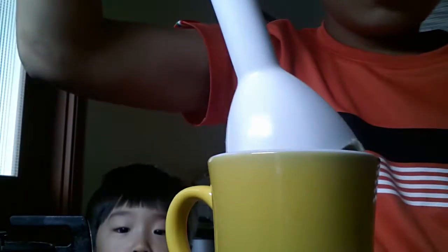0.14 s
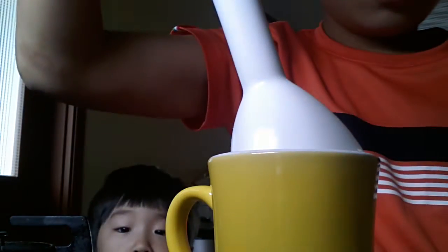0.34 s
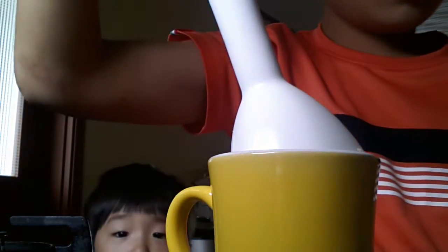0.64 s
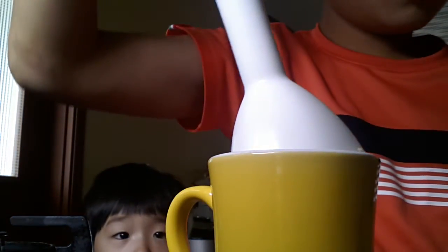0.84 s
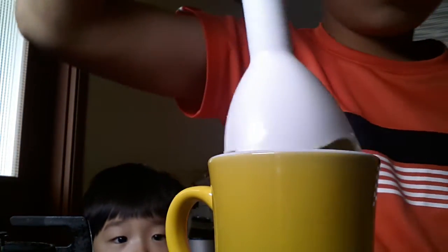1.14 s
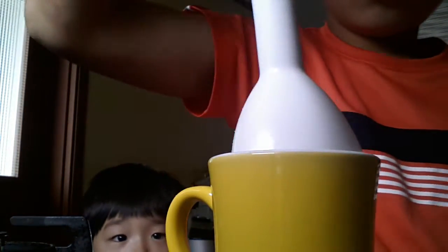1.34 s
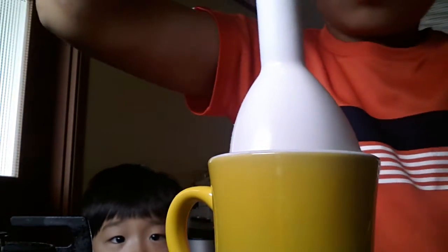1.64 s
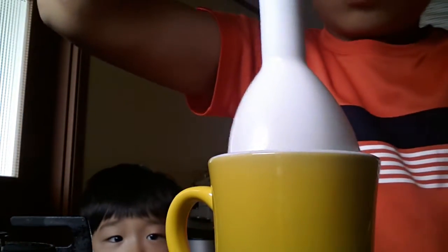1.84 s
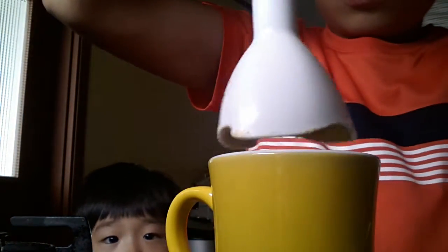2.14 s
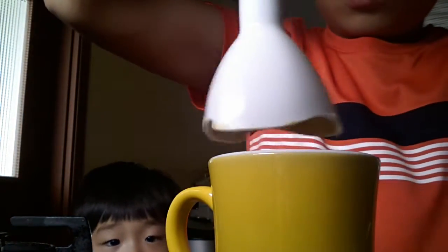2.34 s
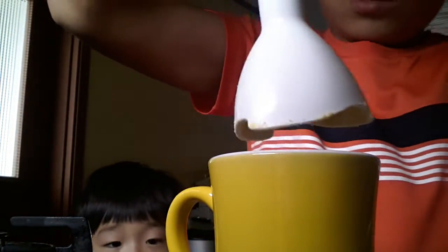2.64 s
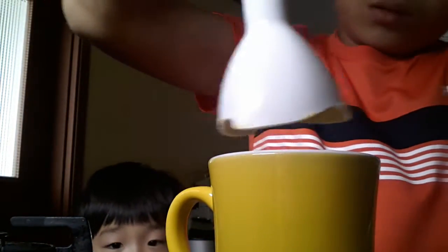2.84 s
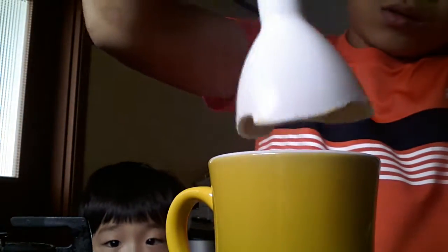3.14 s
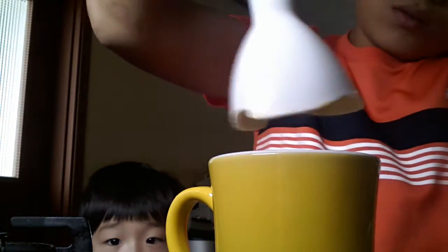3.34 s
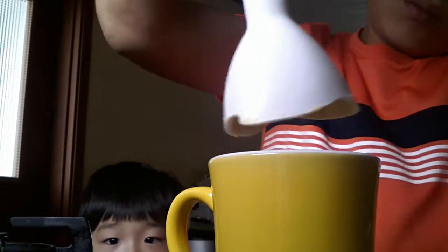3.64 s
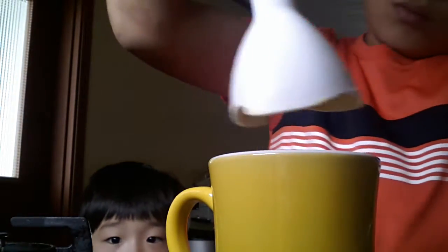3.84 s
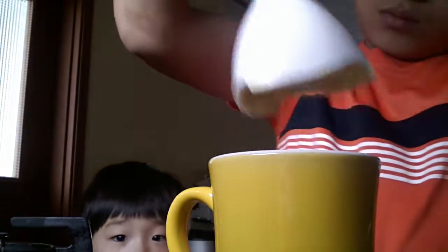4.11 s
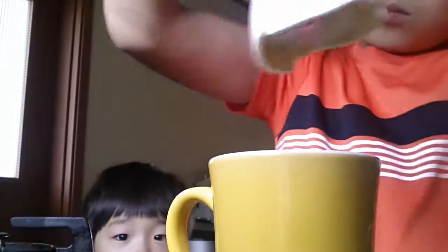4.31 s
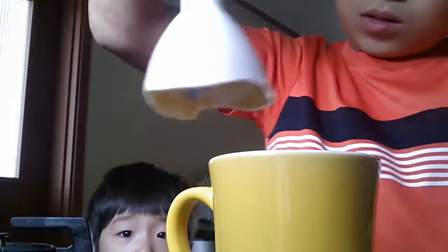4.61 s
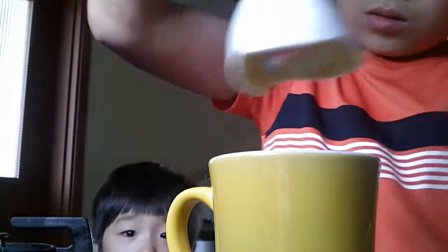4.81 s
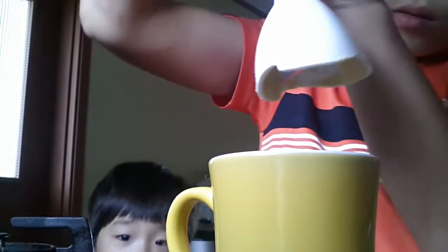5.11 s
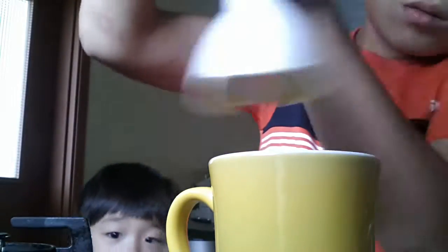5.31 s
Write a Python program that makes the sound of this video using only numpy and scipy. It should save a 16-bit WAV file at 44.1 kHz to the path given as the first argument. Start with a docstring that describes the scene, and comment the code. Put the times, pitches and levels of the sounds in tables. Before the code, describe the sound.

Close stereo pickup in a small, quiet kitchen. A fading knock and faint ceramic ping open, then dull bumps and dry snaps as a blender guard presses snacks in a mug. Ceramic clinks bounce side to side, a button clicks, and the motor whines and rattles in one half-second run and three short bursts. It coasts down with a thin whistle; soft bump, light plastic clicks and grip rubbing follow.

```python
"""A knock is fading as a stick blender goes down onto dry snacks in a ceramic mug: dull bumps and snapping pieces.
Then it clinks against the mug wall, each hit bouncing to the other side. Lifted clear, its motor runs in one long
and three short bursts: shaft tones whine, the loose shaft rattles, and brushes whistle as it coasts to a stop.
A soft bump and a few plastic clicks follow. The hand rubs the grip in the still air of a small kitchen.
Knocks and pings are fading sines; snaps, clinks, clicks, rattle, rubbing and air are shaped noise."""
import sys
import numpy as np
from scipy import signal
from scipy.fft import rfft, irfft
from scipy.io import wavfile
from scipy.ndimage import uniform_filter1d

SR = 44100
rng = np.random.default_rng(int(sys.argv[2]) if len(sys.argv) > 2 else 0)


def wrap_up_sound(samples):
    """Save the sound to the file named by the first command line argument, as 16-bit audio."""
    columns = np.atleast_2d(samples).T
    # keep every value between -1 and 1, then stretch to whole-number steps
    tamed = np.clip(columns, -1, 1)
    steps = np.round(tamed * 32767).astype(np.int16)
    wavfile.write(sys.argv[1], SR, steps)


N = 240820
TIME = np.arange(N) / SR
SIZE = 2 ** 19  # FFT length, samples
HZ = np.maximum(np.arange(SIZE // 2 + 1) * SR / SIZE, 1)


def from_db(db):
    """Turn decibels into a gain."""
    return 10 ** (np.asarray(db) / 20)


def rms_of(x):
    """Root mean square, the usual measure of strength."""
    return np.sqrt(np.mean(np.abs(x) ** 2))


def rms_one(x):
    """Scale to unit power."""
    return x / (rms_of(x) + 1e-20)


def at_hz(points, hz):
    """Read levels between the listed frequencies, on a log-frequency axis."""
    points = np.array(points)
    return np.interp(np.log(hz), np.log(points[:, 0]), points[:, 1])


def pan(balance_db):
    """Left and right gains of constant power, from left minus right in dB."""
    gains = from_db(np.array([[.5], [-.5]]) * balance_db)
    return gains / np.sqrt(np.mean(gains ** 2, axis=0))


def drift(rate):
    """Random wandering: straight lines between random values of spread 1, `rate` values per second."""
    knots = rng.standard_normal(N // 20)
    return np.interp(TIME * rate, np.arange(len(knots)), knots)


def body(x, spectrum, peaks=()):
    """Causal filter of unit power: a broad colour with ringing resonances on top."""
    # folding the cepstrum gives a filter that never sounds before its input
    cepstrum = irfft(np.log(from_db(at_hz(spectrum, HZ))))
    response = np.exp(rfft(2 * cepstrum[:SIZE // 2], SIZE))
    resonances = sum((from_db(db) - 1) / (1 + 2j * (HZ - hz) / width) for hz, width, db in peaks)
    response = response * (1 + resonances)
    return irfft(rfft(x, SIZE) * response / rms_of(response))[..., :N]


def burst(s, level_db, decay, grit_db=-1.5):
    """A contact: a quickly dying shower of uneven tiny impacts, its level taken over 25 ms."""
    age = TIME[:SR // 5]
    # the strength changes every 20 samples
    grit = np.repeat(rng.standard_normal(len(age)), 20)[:len(age)]
    impacts = rng.standard_normal(len(age)) * from_db(grit_db * grit)
    shower = impacts * np.exp(-age / decay) * (1 - np.exp(-age / 0.0019))
    out = np.zeros(N + SR)
    start = max(int(s * SR), 0)
    out[start:start + len(age)] = from_db(level_db) * rms_one(shower) * np.sqrt(.025 * SR / len(age))
    return out[:N]


def contacts(table, colour, peaks=()):
    """Hard contacts sounding through one body."""
    hits = sum(pan(balance) * burst(s, db, decay) for s, db, decay, balance in table)
    return body(hits, colour, peaks)


KITCHEN_T60_S, NEAR_T60_S, LEFT_LAG_S = 0.24, 0.079, .00048


def kitchen(x, near_db, far_db, wall_hz=9000):
    """Direct sound, later on the left, plus table reflections and a duller room tail unlike in each ear."""
    age = TIME[:SR // 2]

    def tail(t60):
        noise = rng.standard_normal((2, len(age)))
        return rms_one(noise * from_db(-60 * age / t60) * (age > .002))

    near = tail(NEAR_T60_S)
    far = signal.lfilter(*signal.butter(1, wall_hz, fs=SR), tail(KITCHEN_T60_S))
    echoes = (from_db(near_db) * near + from_db(far_db) * far) / np.sqrt(len(age))
    # the direct sound
    echoes[0, int(LEFT_LAG_S * SR)] += 1
    echoes[1, 0] += 1
    echoes /= np.sqrt(np.sum(echoes ** 2) / 2)
    return signal.fftconvolve(x * np.ones((2, 1)), echoes, axes=1)[:, :N]


# button held: (start time [s], end time [s], extra rattle at full speed [dB])
PRESSES = [(2.275, 2.853, 0), (3.053, 3.17, 1), (3.3502, 3.4713, 5.3), (3.6483, 3.7377, 4)]
# shaft: top speed and first kick (turns per s), spin-up time, air drag time
FULL_HZ, KICK_HZ, SPIN_UP_S, DRAG_S = 226.14, 67, .0571, .932
FRICTION_HZ_PER_S = 199.3  # bearing friction: turns per s lost each s


def shaft_speed():
    """Turns per second: a press pulls the shaft towards top speed, then drag and friction slow it."""
    speed = np.zeros(N)
    brake = FRICTION_HZ_PER_S * DRAG_S
    for on, off, _ in PRESSES:
        gap = FULL_HZ - max(np.interp(on, TIME, speed), KICK_HZ)
        spinning_up = FULL_HZ - gap * np.exp(-np.abs(TIME - on) / SPIN_UP_S)
        speed = np.where(TIME > on, spinning_up, speed)
        coasting = (np.interp(off, TIME, speed) + brake) * np.exp(-np.abs(TIME - off) / DRAG_S) - brake
        speed = np.where(TIME > off, coasting, speed)
    return np.maximum(speed, 1e-3)


# rattle: level at full speed, loss per turn per s below it; the shaft whips above WHIP_HZ, settles below SETTLE_HZ
SHAKE_DB, SHAKE_DB_PER_HZ, WHIP_HZ, SETTLE_HZ = -29, 0.0969, 154, 43.5
JOLT_DB, JOLT_S = 14, 0.017  # the jolt of starting from rest


def shaking(speed):
    """Rattle in dB: it grows with speed, more in some presses once the shaft whips, and jumps at the start."""
    extra_db = np.zeros(N)
    for on, _, db in PRESSES:
        extra_db[TIME > on] = db
    whipping = np.clip((speed - WHIP_HZ) / (FULL_HZ - WHIP_HZ), 0, 1) ** 0.63
    jolt_db = JOLT_DB * np.exp(-np.abs(TIME - PRESSES[0][0]) / JOLT_S)
    return SHAKE_DB - SHAKE_DB_PER_HZ * (FULL_HZ - speed) + extra_db * whipping + jolt_db


# shaft tones at full speed: (multiple of shaft rate, level [dB])
SHAFT_TONES = [(1, -32), (2, -41.5), (3, -44.5), (4, -41), (5, -43), (6, -48.5), (7, -47), (8, -49.5),
               (9, -52.5), (10, -57.5)]
# how the housing radiates shaft tones: (frequency [Hz], level [dB])
HOUSING = [(80, -9.5), (150, -2.5), (225, -4), (300, -10), (390, -3), (450, 2), (570, 5), (680, 2),
           (820, 3), (905, 4), (1130, 3), (2300, 4)]
# side on which motor sound is stronger: (frequency [Hz], left minus right [dB])
MOTOR_BALANCE = [(200, 5), (420, 12.5), (1000, 10.5), (2500, 8.5), (3900, 10), (5000, 10), (6000, -0.5),
                 (8000, 3), (12000, 6)]


def shaft_tones(speed, pace, angle, torque, shaking_db, usual_db=-31, flutter_db=1.0):
    """Imbalance hums at the shaft rate; the overtones flutter and grow with the rattle."""
    tones = 0
    for k, db in SHAFT_TONES:
        if k == 1:
            force = pace ** 2.5
        else:
            swell_db = 0.71 * (shaking_db - usual_db) + flutter_db * drift(70)
            force = np.sqrt(pace) * torque * from_db(swell_db)
        radiated = from_db(db + at_hz(HOUSING, k * speed))
        wave = np.sin(k * angle + rng.uniform(0, 2 * np.pi))
        tones = tones + force * radiated * wave * pan(at_hz(MOTOR_BALANCE, k * speed))
    return tones


# brush whistle while coasting: (multiple of shaft rate, level [dB])
BRUSH_TONES = [(24, -43), (48, -36.5)]


def brush_whistle(speed, angle, powered):
    """The brushes sing on the commutator as it slows through a narrow range of speed."""
    near_singing_speed = np.exp(-((speed - 153) / 19) ** 2)  # turns per s
    singing = (1 - powered) * near_singing_speed * from_db(3 * drift(60))
    return singing * pan(15.0) * sum(from_db(db) * np.sin(k * angle) for k, db in BRUSH_TONES)


# colour of the low buzz: (frequency [Hz], level [dB per Hz])
BUZZ = [(40, -35.5), (150, -2), (330, -10), (520, 1.5), (800, 0), (1200, -7), (1550, -4), (2000, -2.5),
        (2800, -14), (4500, -34.5)]
# colour of the bright rattle: (frequency [Hz], level [dB per Hz])
RATTLE = [(1500, -36), (3050, -15), (3800, -12), (4800, -1.5), (5800, -5.5), (6600, -2.5), (7600, -6),
          (9000, -4.5), (11000, -13), (12500, -13.5), (14500, -33.5)]
# shaft and guard resonances: (frequency [Hz], width [Hz], level [dB])
GUARD = [(1520, 280, 11), (3800, 440, 12), (4280, 50, 4.5), (4974, 540, 6), (6520, 290, 9.5),
         (7280, 620, 9.5)]


def shaft_rattle(pace, angle, torque, strength, beat=0.3, whirl=0.056, grain_db=2.5, buzz_db=-5.0, rattle_db=2):
    """The loose shaft strikes its bearing unevenly on every turn and whirls round once in three."""
    strikes = np.exp(beat * np.cos(angle) + whirl * np.cos(angle / 3))
    blows = strength * rms_one(torque * strikes * from_db(grain_db * drift(500)))
    buzz = from_db(buzz_db) * body(blows * pace ** 0.1 * rng.standard_normal(N), BUZZ, GUARD)
    rattle = from_db(rattle_db) * body(blows * rng.standard_normal(N), RATTLE, GUARD)
    return irfft(rfft(buzz + rattle, SIZE) * pan(at_hz(MOTOR_BALANCE, HZ)))[:, :N]


MAINS_HZ = 60


def motor(ripple=0.78, wobble=0.0014):
    """Shaft tones, brush whistle and a rattle that beats with each turn and with the mains."""
    speed = shaft_speed()
    shaking_db = shaking(speed)
    turning = 1 - np.exp(-(speed / SETTLE_HZ) ** 3)
    pace = turning * speed / speed.max()
    held = sum(1. * ((TIME > on) & (TIME < off)) for on, off, _ in PRESSES)
    powered = uniform_filter1d(held, size=900)
    angle = 2 * np.pi * np.cumsum(speed * (1 + wobble * drift(200))) / SR
    # torque comes in mains pulses while the button is held, strongest while the shaft gathers speed
    effort = powered * np.clip(1 - speed / FULL_HZ, 0, 1) ** 0.28
    torque = 1 + ripple * effort * np.cos(2 * np.pi * MAINS_HZ * TIME)
    tones = shaft_tones(speed, pace, angle, torque, shaking_db)
    whine = tones + brush_whistle(speed, angle, powered)
    clatter = shaft_rattle(pace, angle, torque, turning * from_db(shaking_db))
    return kitchen(clatter, near_db=1.0, far_db=-5) + kitchen(whine, near_db=-14, far_db=-13)


# the guard hits the mug wall and bounces to the other side:
# (time [s], level [dB], left minus right [dB], bounce delay [s], bounce level above the hit [dB])
CLINKS = [(1.582, -19.5, 0, 0.02, -6), (1.653, -31, 0.5, 0.014, -4.5), (1.728, -43, -0.5, .011, -4),
          (1.794, -43, -2, 0.016, 4), (1.853, -38.5, 4, 0.0097, -13.5), (1.902, -39.5, 2, 0.016, 0.5),
          (2.153, -18, -8.5, 0.0099, -1.5)]
# a hit dies quickly; a bounce chatters for a share of its flight time
CLINK_DECAY_S, CHATTER_SHARE = 0.0035, 0.48


def wall_hits():
    """Each clink and its bounce off the opposite wall, as (time [s], level [dB], decay [s], balance [dB])."""
    hits, bounces = [], []
    for s, db, side, flight, bounce_db in CLINKS:
        hits.append((s, db, CLINK_DECAY_S, side))
        bounces.append((s + flight, db + bounce_db, CHATTER_SHARE * flight, -side))
    return hits + bounces


# ringing tones of the mug wall: (frequency [Hz], level above the broad colour [dB])
MUG = [(1997, 10), (2735, 10), (4037, 9), (5120, 13), (5329, 14), (6444, 12), (6740, 8), (8473, 7),
       (8694, 11), (9254, 12), (10275, 20), (11450, 9), (12510, 10), (13160, 11), (13850, 10)]
# broad colour of the clinks: (frequency [Hz], level [dB per Hz])
CLINK_COLOUR = [(60, -38), (250, -22), (900, -9), (2000, -12.5), (3300, -13), (5000, -7), (7000, 2),
                (9000, -6), (11000, -10.5), (14500, -14.5)]


def clinks(mug_width_hz=24):
    """Hard hits set off the narrow resonances of the ceramic wall."""
    wall = [(hz, mug_width_hz, db) for hz, db in MUG]
    return kitchen(contacts(wall_hits(), CLINK_COLOUR, wall), near_db=2.5, far_db=-2.5)


# the mug pings: (time [s], frequency [Hz], level [dB], time to fall 60 dB [s])
PINGS = [(0, 2740, -38, 0.34), (4.949, 2000, -36, 0.076)]


def pings():
    """A light touch leaves one mode of the mug wall ringing."""
    out = 0
    for s, hz, db, t60 in PINGS:
        fade = from_db(db - 60 * np.abs(TIME - s) / t60)
        out = out + (TIME > s) * fade * np.sin(2 * np.pi * hz * (TIME - s))
    return pan(15) * out


# button and handle plastic: (time [s], level [dB], decay [s], left minus right [dB])
CLICKS = [(2.2725, -25.5, 0.0032, -4), (2.275, -22.5, 0.0017, 9), (4.912, -40, .003, 1),
          (4.9165, -34, 0.0028, 35), (4.95, -44.5, 0.017, 3), (5.315, -57, 0.0088, 20),
          (5.3335, -37.5, 0.00033, 8.5)]
# colour of the plastic: (frequency [Hz], level [dB per Hz])
CLICK_COLOUR = [(60, -27.5), (800, -5.5), (1600, -4), (2800, -14), (4000, 1.5), (5500, 0.5), (6800, 2),
                (9000, -3), (12000, -8), (14500, -15)]


def clicks():
    """Short contacts sound through the plastic of button and handle."""
    return kitchen(contacts(CLICKS, CLICK_COLOUR), near_db=-2.0, far_db=-8)


# dull bumps, mostly the guard coming down on the snacks:
# (time [s], level [dB], second touch above the first [dB])
KNOCKS = [(0.055, -29, -34), (0.336, -40.5, -16), (0.708, -55, -10), (0.859, -50.5, -13),
          (0.922, -35.5, -34), (0.991, -28.5, -39), (1.116, -45, -10), (1.223, -25.5, -6.5),
          (1.367, -34.5, -1), (1.478, -44.5, -14), (1.53, -39, 0), (1.81, -39, -9.5), (2.089, -40.5, -3.5),
          (4.848, -50.5, 2.5)]
SECOND_TOUCH_S = .013  # a bump settles with a second touch this much later
# hard contacts thud too: level under a -19.5 dB clink or click, and dB of thud per dB of contact
CLINK_THUD_DB, CLICK_THUD_DB, THUD_FOLLOWS = -32, -34.5, 0.64


def thuds():
    """All dull blows as (time [s], level [dB]): bumps, second touches, and the weight behind clinks and clicks."""
    rows = []
    for s, db, again_db in KNOCKS:
        rows += [(s, db), (s + SECOND_TOUCH_S, db + again_db)]
    for table, thud_db in ((CLINKS, CLINK_THUD_DB), (CLICKS, CLICK_THUD_DB)):
        rows += [(s, thud_db + THUD_FOLLOWS * (db + 19.5)) for s, db, *_ in table]
    return rows


# dull thud tones under bumps, clinks and clicks: (frequency [Hz], level [dB], time to fall 60 dB [s])
THUD = [(107.9, -15, 0.15), (149.7, -10, 0.051), (239.6, -0.5, 0.036), (346, -12.5, 0.036),
        (467, -3, 0.057), (627, -3, 0.038), (834, -8, 0.026), (1104, -14.5, 0.033), (1492, -8, 0.021),
        (1700, -21, 0.034)]


def knocks(pitch_spread=0.067, crush_db=-10, crush_hz=550, crush_s=0.0089):
    """Each blow sounds the dull thud tones, every one with a strength of its own, over a brief dull crush."""
    age = TIME[:SR // 4]
    out = np.zeros(N + SR)
    soft = signal.butter(2, crush_hz, fs=SR)
    for s, db in thuds():
        ring = 0
        for k, (hz, level, t60) in enumerate(THUD):
            fade = from_db(level + rng.normal(0, 1.4) - 60 * age / t60)
            wave = np.sin(2 * np.pi * hz * rng.normal(1, pitch_spread) * age)
            ring = ring + fade * wave * (-1) ** k
        crush = signal.lfilter(*soft, rng.standard_normal(len(age)) * np.exp(-age / crush_s))
        blow = rms_one(ring) + from_db(crush_db) * rms_one(crush)
        soft_start = 1 - np.exp(-age / 0.0023)
        start = int(s * SR)
        out[start:start + len(age)] += from_db(db - 11.5) * rms_one(blow * soft_start)
    return kitchen(out[:N] * pan(8.4), near_db=-7.5, far_db=0.0)


# each bump crushes a few crumbs: spread of delay, level relative to the bump, decay, centre
CRUMBS_AFTER_S, CRUMBS_DB, CRUMBS_DECAY_S, CRUMBS_HZ = .015, -25, .007, 6150


def crumbs(spread_db=2):
    """One faint crackle just after each bump, of random delay, strength, size and side."""
    rows = []
    for s, db, _ in KNOCKS:
        late, hard, size, side = rng.standard_normal(4)
        when = s + CRUMBS_AFTER_S * abs(late)
        level_db = db + CRUMBS_DB + spread_db * hard
        rows.append((when, level_db, CRUMBS_DECAY_S, CRUMBS_HZ * 2 ** (size / 10), spread_db * side))
    return rows


# pieces snap or crunch; the last row (5.209 s) is a light plastic tick of the handle:
# (time [s], level [dB], decay [s], centre [Hz], left minus right [dB])
SNAPS = [(0.087, -43.5, 0.017, 6800, 1), (0.149, -43, 0.0095, 7100, 0.5), (0.336, -49, 0.0019, 7500, 0),
         (0.9215, -33, 0.00045, 3790, 9), (1.0022, -40, 0.00019, 3880, 9),
         (1.203, -47.5, 0.012, 6450, -15.5), (1.224, -28.5, 0.0018, 5180, 4),
         (1.2257, -43, 0.0016, 3220, 12), (1.382, -45, .002, 5660, -6), (1.595, -37, 0.021, 3360, 6),
         (1.738, -38.5, 0.0015, 4470, 9), (2.088, -44.5, 0.0022, 3640, 9), (2.113, -41.5, 0.02, 4340, 0.5),
         (5.209, -54, 0.0019, 3200, 14.5)]


def snaps(sharpness=1.87, splinter_db=-11, shade_hz=9000):
    """Dry pieces break: a clack pitched by size over a fainter spray; a handle tick is made the same way."""
    out = 0
    for s, db, decay, hz, balance in SNAPS + crumbs():
        crack = burst(s, db, decay)
        piece = signal.iirpeak(hz, sharpness, fs=SR)
        spray = signal.lfilter(*piece, crack)
        clack = signal.lfilter(*piece, spray)
        snap = rms_one(clack) + from_db(splinter_db) * rms_one(spray)
        out = out + pan(balance) * rms_of(crack) * rms_one(snap)
    # for pieces in the mug, its wall shades the highest treble; the handle tick is softened alike
    shade = signal.butter(1, shade_hz, fs=SR, output="sos")
    return kitchen(signal.sosfilt(shade, out), near_db=-3, far_db=-8.0)


# the hand slides on the grip: (middle time [s], half length [s], level [dB])
SLIDES = [(0.314, 0.27, -64.5), (1.765, 0.6, -57), (4.2, 0.17, -58), (4.485, 0.028, -56),
          (4.567, 0.047, -56), (5.151, 0.35, -67)]
GRIP_DB = -73  # faint rubbing of the hand at rest


def sliding():
    """Strength of the rubbing: each slide swells and fades over the resting grip."""
    slides = sum(from_db(db) * np.exp(-((TIME - s) / half) ** 2) for s, half, db in SLIDES)
    return from_db(GRIP_DB) + slides


# colour of the rubbing: (frequency [Hz], level [dB per Hz])
RUB_COLOUR = [(150, 7.5), (600, 6), (2200, -10.5), (3200, -8), (4300, -11), (6100, -3.5), (7200, -10),
              (8100, -12), (10000, -15), (14500, -19)]


def rubbing():
    """The hand rubs the grip: coloured noise of uneven strength."""
    noise = body(rng.standard_normal((2, N)), RUB_COLOUR)
    return sliding() * from_db(4.4 * drift(75)) * noise * pan(5.4)


def fading_knock(boom_db=-31, boom_t60=0.4):
    """The room is still booming from a knock just before: dull noise dying away."""
    colour = [(60, 5), (450, 7.5), (1100, 4.0), (2500, -13.0), (12000, -23.0)]  # (Hz, dB per Hz)
    boom = body(rng.standard_normal((2, N)), colour)
    return pan(7.2) * from_db(boom_db - 60 * TIME / boom_t60) * boom


# colour of the still air: (frequency [Hz], level [dB per Hz])
AIR = [(25, -11.5), (55, -13), (80, 3), (110, -4.5), (300, -5.5), (450, -11.5), (620, -5.5), (800, -16),
       (950, -10), (1200, -16.5), (2500, -29.5), (4500, -38), (15000, -31)]
AIR_DB = -64.5


def still_air():
    """Quiet coloured noise, partly shared by both ears, its level wandering a little."""
    noise = rng.standard_normal(N) + .5 * rng.standard_normal((2, N))
    return from_db(AIR_DB + drift(30)) * body(noise, AIR) * pan(2.6)


def scene():
    """The motor, the contacts, the rubbing hand, a fading knock and still air."""
    touches = clinks() + pings() + clicks() + knocks() + snaps()
    return motor() + touches + rubbing() + fading_knock() + still_air()


CUTOFF_HZ = 14900


def record(dry):
    """The top is cut steeply."""
    return signal.sosfilt(signal.ellip(10, .2, 80, CUTOFF_HZ, fs=SR, output="sos"), dry)


dry = scene()
out = record(dry)
wrap_up_sound(out)
```